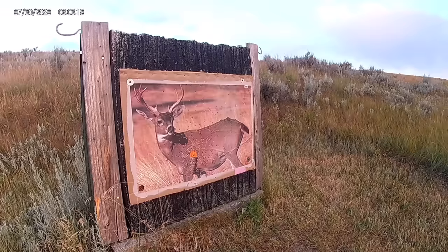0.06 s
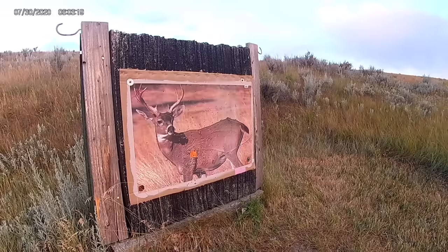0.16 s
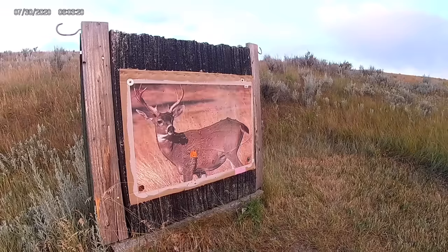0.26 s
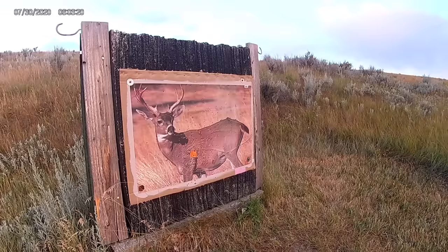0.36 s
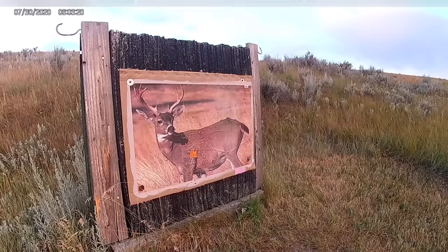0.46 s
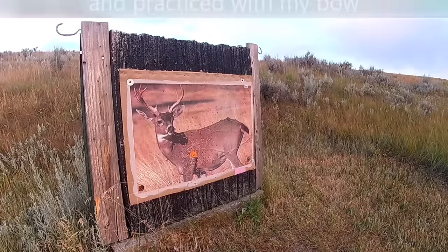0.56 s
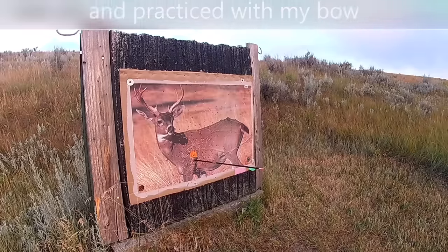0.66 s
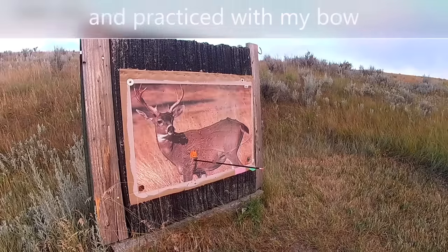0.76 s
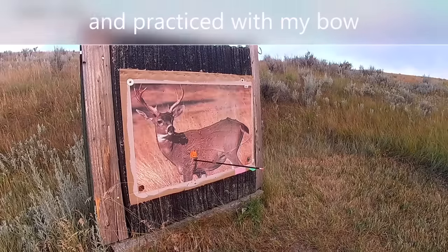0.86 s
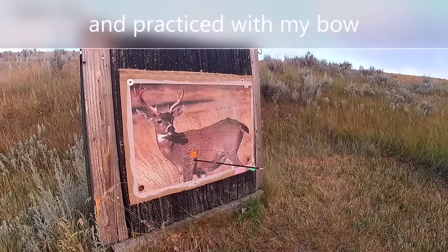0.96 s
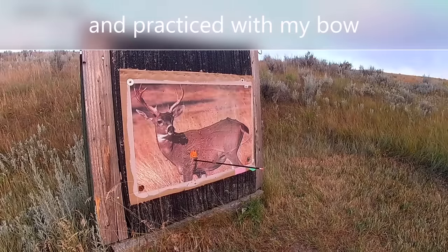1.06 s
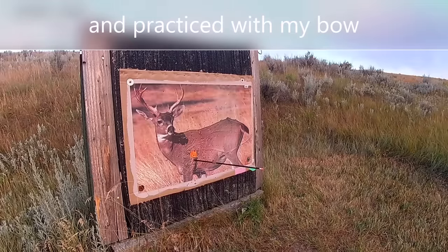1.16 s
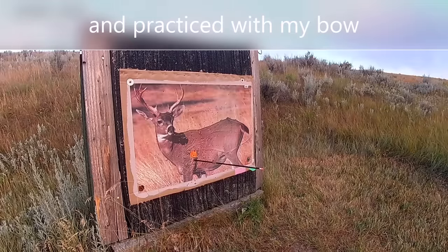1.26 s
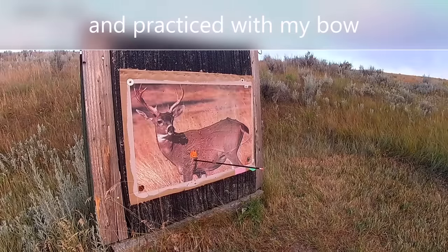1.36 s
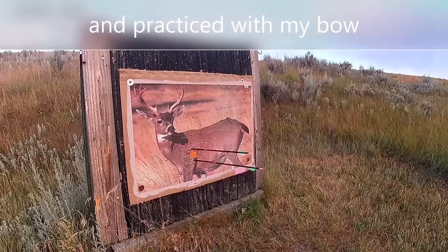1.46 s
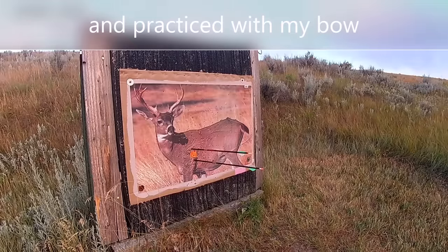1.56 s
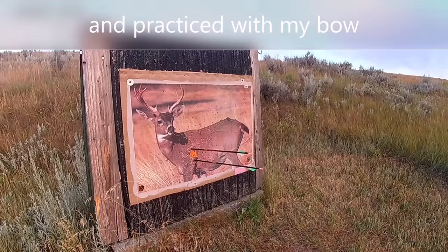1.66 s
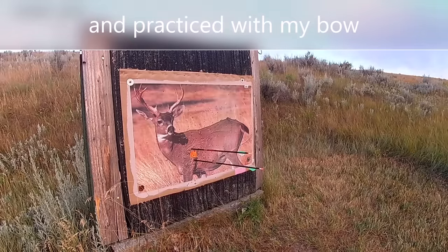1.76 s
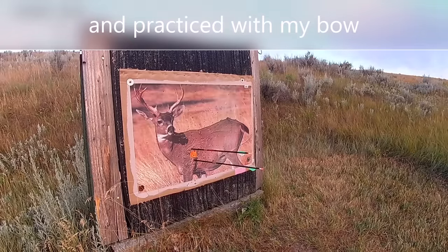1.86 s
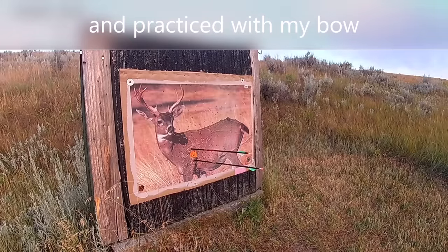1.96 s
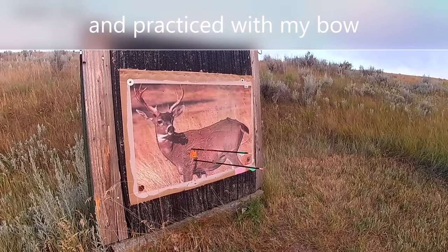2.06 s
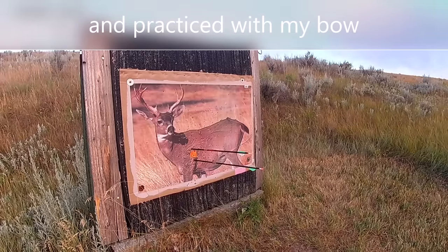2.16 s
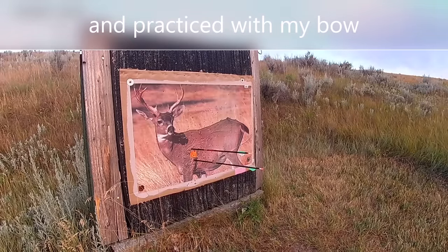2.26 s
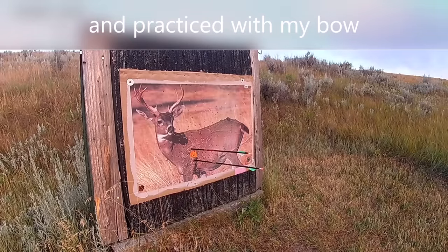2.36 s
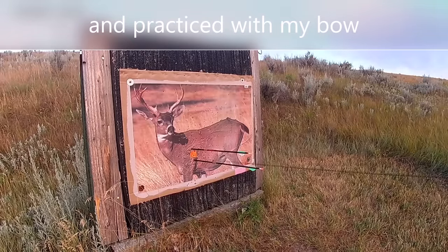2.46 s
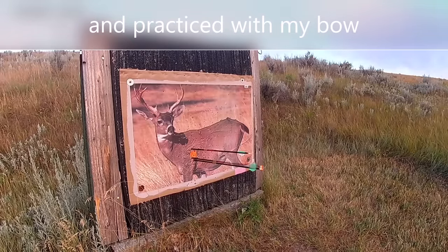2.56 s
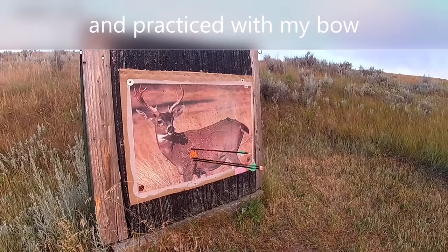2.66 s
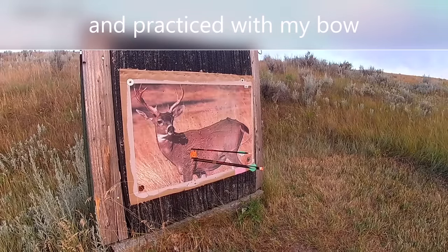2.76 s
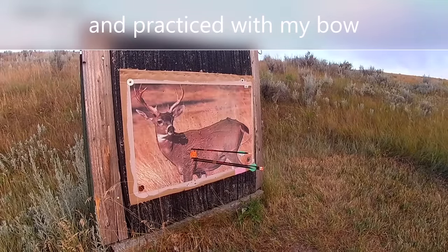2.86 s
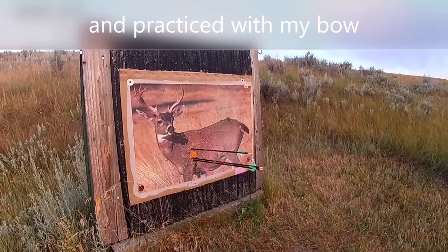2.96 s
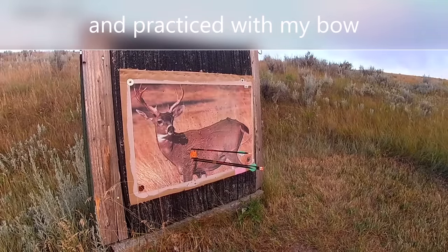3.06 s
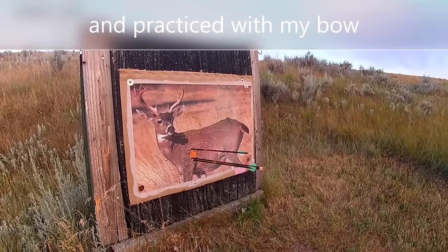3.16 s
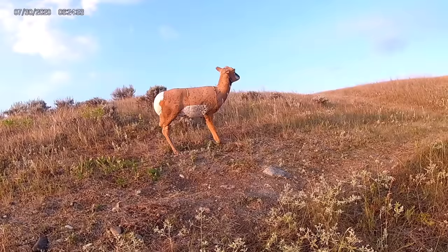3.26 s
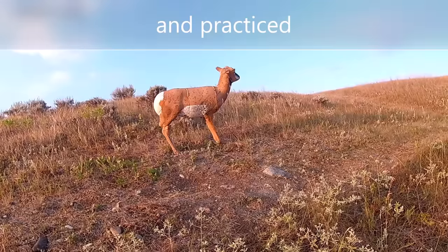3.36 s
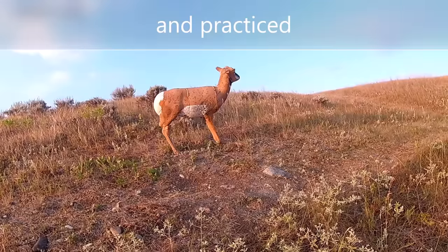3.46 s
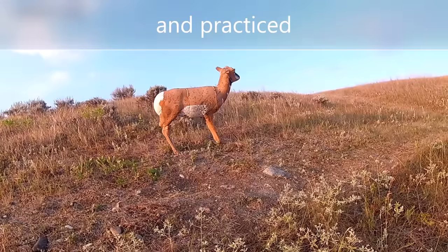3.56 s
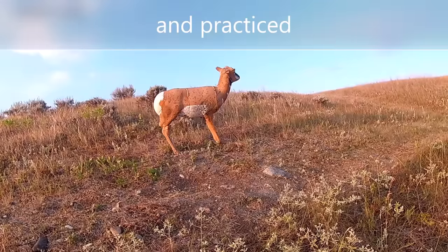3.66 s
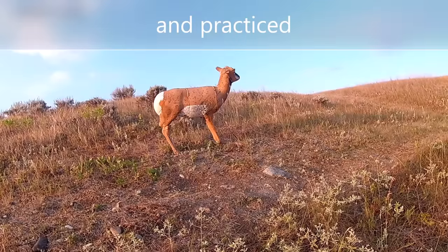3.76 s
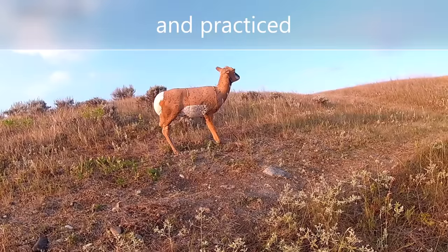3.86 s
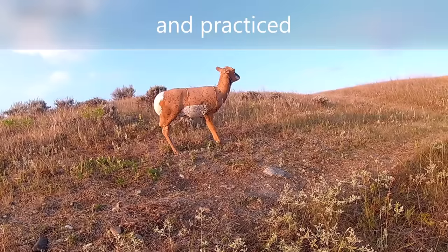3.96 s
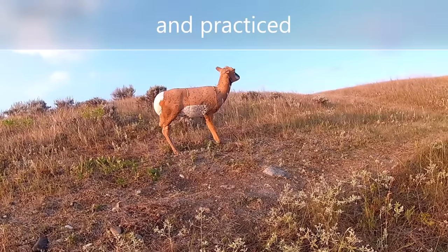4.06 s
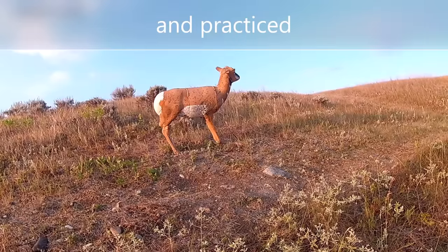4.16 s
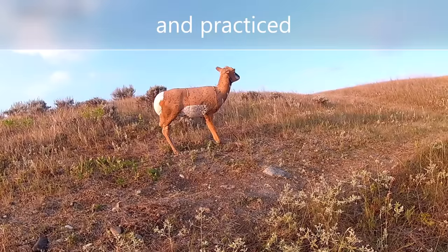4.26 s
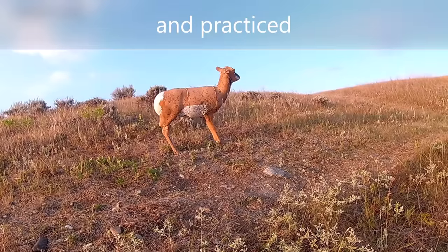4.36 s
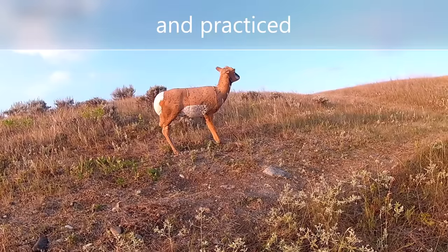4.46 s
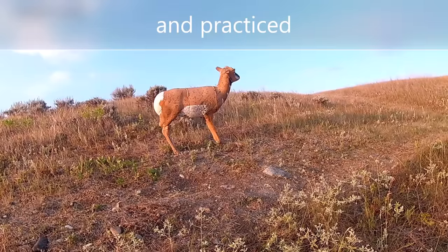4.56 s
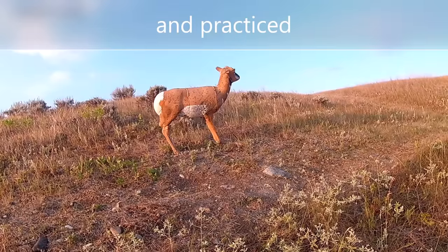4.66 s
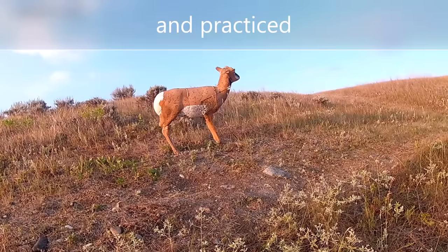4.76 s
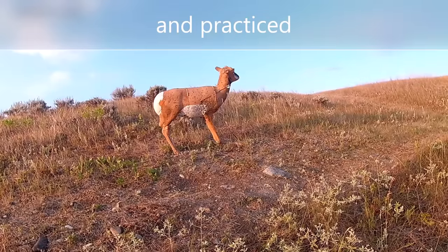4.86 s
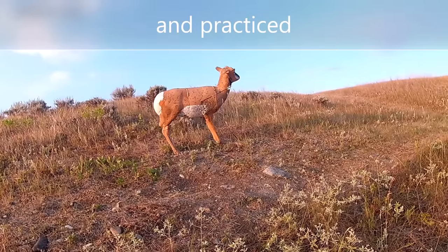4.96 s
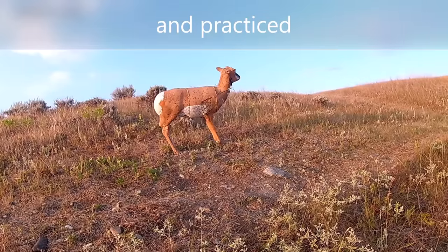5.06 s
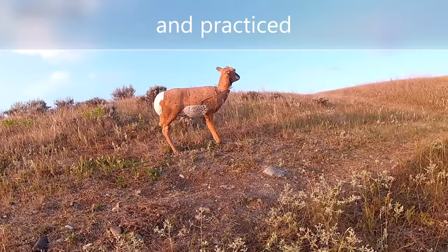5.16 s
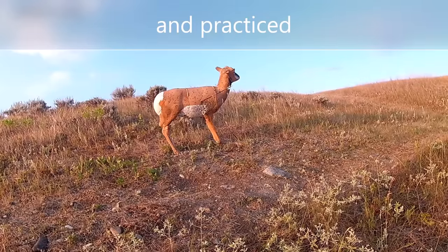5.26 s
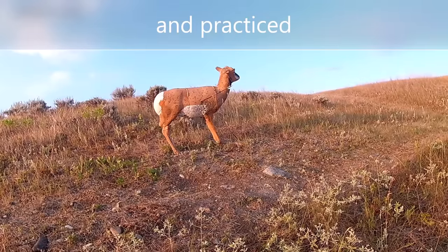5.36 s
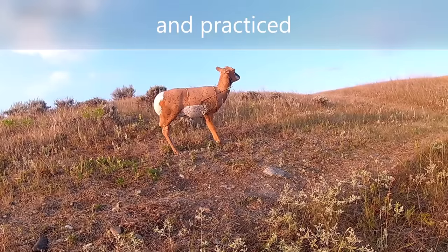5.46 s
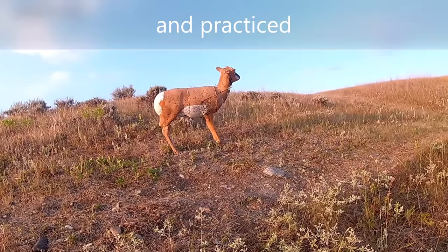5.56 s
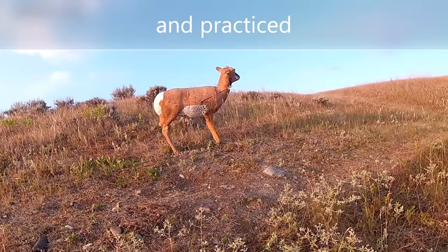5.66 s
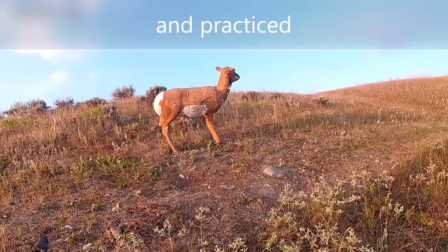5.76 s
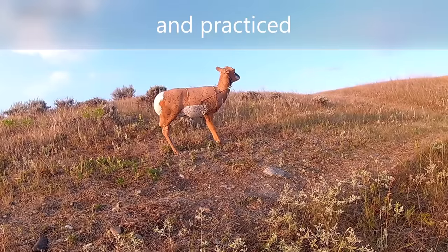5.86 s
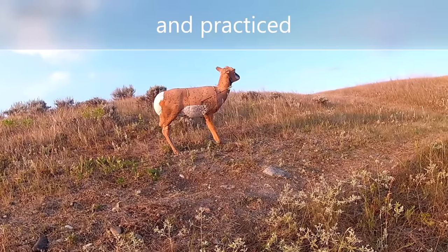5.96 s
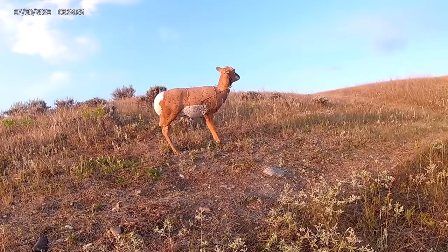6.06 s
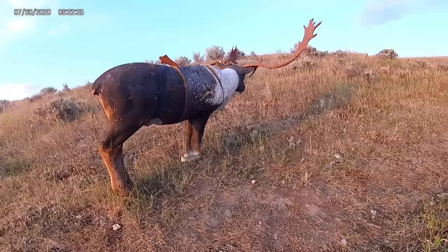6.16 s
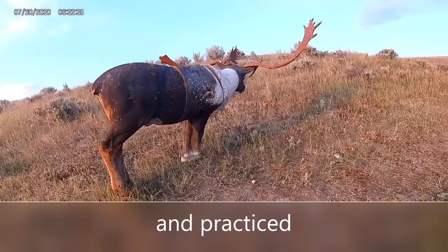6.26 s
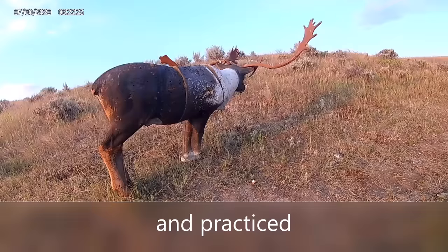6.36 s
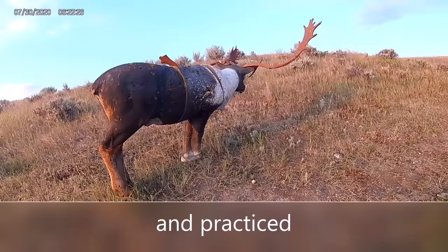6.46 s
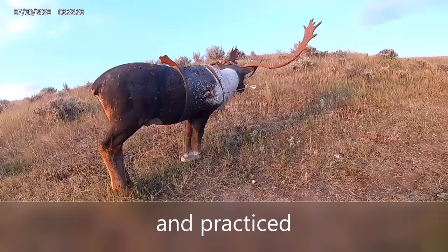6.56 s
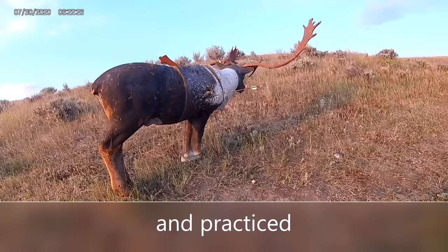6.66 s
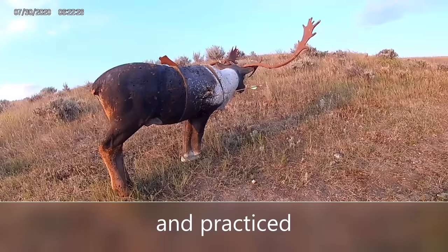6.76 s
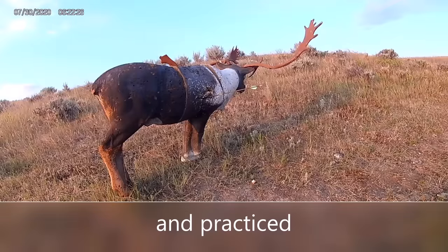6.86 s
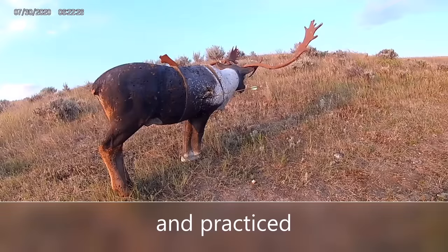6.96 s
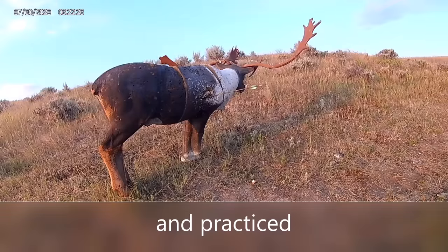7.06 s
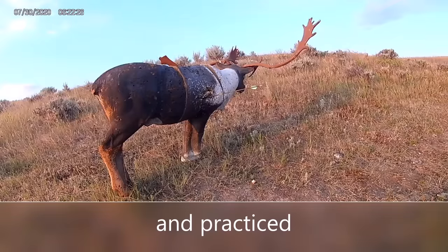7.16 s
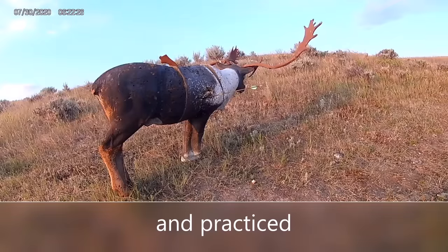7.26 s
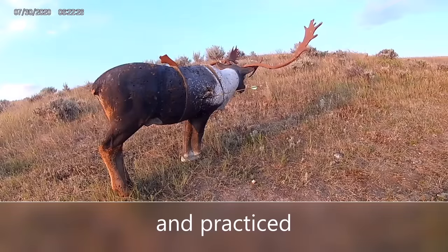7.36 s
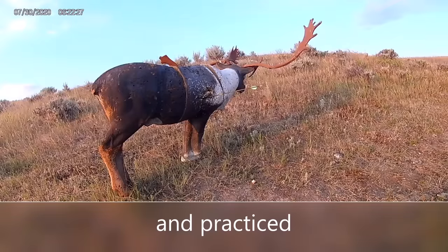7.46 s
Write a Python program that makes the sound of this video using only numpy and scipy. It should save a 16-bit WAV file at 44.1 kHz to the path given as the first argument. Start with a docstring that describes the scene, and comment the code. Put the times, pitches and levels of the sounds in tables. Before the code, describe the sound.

Archery practice on a quiet grassy hillside, heard from right beside the targets. Three times a soft distant bow snap is followed quickly by a loud, sharp crack and woody knock as an arrow punches a paper-faced board. Then a duller bow snap and a hollow thud into a foam deer, some small dry ticks, and a last snap and deep hollow thump into a foam caribou. Faint air throughout, one barely audible bird whistle.

```python
"""Hillside archery practice

Three outdoor scenes heard from beside the targets, over faint shaped-noise air and one far sine whistle.
Each distant bow snaps in bursts of filtered noise, then vane hiss swells as one over the distance.
Arrows land as damped modes of face, shaft and body with a tear and a diffuse tail: three cracks in a
paper-faced board, then hollow thuds in a foam deer and a foam caribou. A few dry noise ticks between."""
import sys
import numpy as np
from scipy import signal
from scipy.fft import rfft, irfft
from scipy.io import wavfile

SR = 44100
rng = np.random.default_rng(int(sys.argv[2]) if len(sys.argv) > 2 else 0)


def unload_audio(sound):
    """Save the sound as a 16-bit wav file, at the path given as the first command line argument."""
    columns = np.transpose(np.atleast_2d(sound))
    # keep every value between -1 and 1, then stretch to whole-number steps
    steps = np.round(np.clip(columns, -1, 1) * 32767)
    wavfile.write(sys.argv[1], SR, steps.astype(np.int16))


N = 331191
TIME = np.arange(N) / SR
AGE = TIME[:SR // 2]   # time since the start of one short sound

# Outdoor air around the board and around the foam animals: pitch_hz, relative density_db (per Hz)
BOARD_AIR = [(15, -36.5), (25, -6.5), (44, -7), (101, -3), (133, -0.5), (164, -11.5), (198, -1), (410, -13),
             (552, -14), (598, -11), (666, -16.5), (871, -16), (1170, -20.5), (1300, -20.5), (15500, -44)]
SLOPE_AIR = [(15, -19.5), (25, -6), (69, -0.5), (116, -2), (209, -7.5), (297, -9), (741, -17.5),
             (1200, -22), (1950, -27), (2420, -29.5), (3000, -32.5), (6210, -43), (7500, -43),
             (10100, -50.5), (15500, -47.5)]
# The air of each scene: start_s, end_s, level_db
BOARD_SCENE, DEER_SCENE, CARIBOU_SCENE = (0.11, 3.182, -66.5), (3.291, 6.176, -63.5), (6.258, 7.6, -64)
# Brief level dips in the board scene's background, all of one depth and width
DIPS_S, DIP_DB, DIP_WIDTH_S = [1.080, 1.5, 2.879], -19, 0.01

# Bow releases: start_s, level_db, string_slap_db (against the release), place
RELEASES = [(0.5600, -40.5, -1.5, "board"), (1.2983, -45.5, 1, "board"), (2.2144, -49.5, -2.5, "board"),
            (4.5230, -43.5, -0.5, "slope"), (6.2840, -45.5, -1.5, "slope")]
# The bow as heard from each place: centre_hz, treble_edge_hz (for a release at BOW_USUAL_DB), t60_s,
# limb_thump_db, cable_sizzle_db (both against the release)
BOW_COLOUR = {"board": (2350, 4500, 0.068, -13, -24), "slope": (1150, 2200, 0.087, -4, -45)}
# A louder release is brighter: its treble edge rises an octave per BOW_DB_PER_OCTAVE
BOW_USUAL_DB, BOW_DB_PER_OCTAVE = -45, 24

# The arrow's approach to each target: nearing_s, vane_hiss_centre_hz
APPROACH = {"board": (0.005, 2750), "deer": (0.029, 1400), "caribou": (0.011, 1390)}
# Vane hiss on landing for a nearing time of CLOSE_S; each doubling of that time makes it fainter and duller
CLOSE_S, VANE_DB, VANE_EDGE_HZ = 0.005, -39.5, 11000
VANE_LOSS_DB, VANE_LOSS_OCTAVES = 3.8, 0.45
VANE_REACH = 3.3   # the hiss emerges this many nearing times before the landing

# Landings: start_s, target, face_db, face_pitch_ratio, body_db, shaft_ping_db, tear_db, tear_t60_s
# (face, body and ping levels are added to those of the modes)
ARROWS = [(0.6585, "board", 1, 0.99, -1, 4, -22, 0.01), (1.494, "board", -2.5, 0.9, -1.5, -12, -33, 0.006),
          (2.5199, "board", 3, 1.0, -1.5, -1, -30, 0.036), (4.7894, "deer", 3.5, 1.0, 0.5, -19, -50, 0.061),
          (6.5953, "caribou", -2, 1.0, 0.5, -21, -52, 0.08)]
# How each target yields: bite_s, shaft_stopping_s, rebound_delay_s, scatter_db (against the landing's body_db)
GIVE = {"board": (0.00015, 0.0026, 0.0084, -31.5), "deer": (0.002, 0.00465, 0.005, -29.5),
        "caribou": (0.00043, 0.0058, 0.0109, -30.5)}
# Face modes, rung as the point breaks through: pitch_hz (before the landing's ratio),
# level_db (before a random spread), t60_s
BOARD_FACE = [(883, -29, 0.037), (1120, -22.5, 0.022), (1450, -25, .01), (1800, -21.5, .009),
              (2270, -11, 0.008), (2852, -20.5, 0.011), (3290, -21.5, .007), (5300, -35.5, 0.0055)]
DEER_FACE = [(737, -29.5, 0.052), (862, -11, 0.015), (1010, -29, 0.012), (1520, -31, 0.025),
             (1936, -30, 0.016), (2770, -31, 0.0084)]
CARIBOU_FACE = [(612, -18, 0.013), (880, -25, 0.055), (1097, -17, 0.02), (1237, -23, 0.033),
                (1795, -23.5, 0.025), (2800, -34.5, 0.017), (3830, -41.5, 0.035)]
FACES = {"board": BOARD_FACE, "deer": DEER_FACE, "caribou": CARIBOU_FACE}
# The thin ping of point and shaft: pitch_hz, level_db (before a random spread), t60_s
SHAFT = [(5270, -43, 0.03), (5860, -45, 0.027), (8050, -48, 0.028), (10730, -55, 0.04), (12500, -52, 0.028),
         (13000, -53, 0.025)]
# Body modes, rung as the shaft is stopped: pitch_hz (before BODY_PITCH), level_db (before a random spread), t60_s
BODIES = { "board": [(94, -39, .15), (139, -23.5, 0.031), (182.35, -44.5, 0.35), (259, -30, .06),
          (328.5, -35, 0.13), (344, -41, 0.21), (528, -33, .06), (569, -34, .04), (702.4, -34, .035),
          (824, -42, .055), (958, -41.5, .08)], "deer": [(149.6, -50.5, .08), (246.4, -21.5, 0.034),
          (300, -16.5, 0.033), (364, -19, 0.0249), (491, -24, 0.036)], "caribou": [(88, -33.5, 0.1),
          (181.7, -31.5, 0.099), (198, -36.5, 0.17), (304, -20.5, 0.037), (349, -24, 0.043),
          (439, -5, 0.016), (490, -18.5, 0.025)]}
BODY_PITCH, REBOUND_DB = 0.97, -12   # pitch ratio; rebound level against the body's first thud
# Sound scattered by frame, ground and brush: pitch_hz, relative density_db (per Hz), t60_s
BOARD_SCATTER = [(70, -11, .17), (140, -3.5, 0.23), (400, -2.5, .12), (865, 0, 0.11), (1500, -5, .045),
                 (3000, -6.5, 0.025), (5500, -19, 0.036), (8000, -27, 0.06), (15000, -38, .04)]
DEER_SCATTER = [(70, -4.5, 0.11), (200, 2.5, .11), (500, 3.5, 0.083), (900, 1, 0.075), (1590, -9, 0.12),
                (2930, -20, 0.063), (4940, -37.5, 0.029), (8000, -44, 0.037), (14950, -43.5, 0.073)]
CARIBOU_SCATTER = [(70, -13, 0.19), (200, 2, 0.12), (500, 5.5, 0.082), (1000, -3.5, 0.074),
                   (1800, -8, 0.077), (2980, -20.5, 0.084), (4970, -33, 0.13), (8000, -35, 0.073),
                   (14900, -36, 0.081)]
SCATTER = {"board": BOARD_SCATTER, "deer": DEER_SCATTER, "caribou": CARIBOU_SCATTER}
# A tear no longer than QUICK_TEAR_S is centred on TEAR_HZ; slower ones are duller by this power of their length
TEAR_HZ, QUICK_TEAR_S, TEAR_DULLING = 5400, 0.01, 0.8

# Small dry ticks: start_s, level_db, centre_hz, t60_s
TICKS = [(3.313, -57.5, 986, 0.012), (4.8200, -43, 1200, 0.02), (4.9195, -54.5, 1620, 0.016),
         (5.2465, -50, 870, 0.042), (5.7055, -56, 1150, 0.028)]
TICK_EDGE_HZ = 2550

# One far bird whistle: start_s, final_pitch_hz, level_db
BIRD = (6.91, 2344, -78)
# It starts high and settles, with a fade at both ends
BIRD_SAG_HZ, BIRD_SAG_S, BIRD_FADE_S, BIRD_LENGTH_S = 115, 0.025, 0.014, 0.13

CUTOFF_HZ = 15750


def from_db(db):
    """Decibels to gain."""
    return 10 ** (np.asarray(db) / 20)


def rms_one(x):
    """Scale to rms 1."""
    return x / np.sqrt(np.mean(x ** 2) + 1e-20)


def at_hz(points, hz):
    """Read a table on a log-frequency axis."""
    known_hz, values = np.transpose(points)
    return np.interp(np.log(np.maximum(hz, 1)), np.log(known_hz), values)


def add(out, s, sound):
    """Mix a sound in from time s on."""
    start = int(round(s * SR))
    out[start:start + len(sound)] += sound[:N - start]


def noise(gain_at, size):
    """Noise of rms 1 whose colour is a function of frequency."""
    hz = np.fft.rfftfreq(size, 1 / SR)
    spectrum = rfft(rng.standard_normal(size))
    return rms_one(irfft(spectrum * gain_at(hz), size))


def fade(t60):
    """Exponential decay, 60 dB in t60."""
    return np.exp(-np.log(1000) * AGE / t60)


def onset(rise_s):
    """Exponential approach to full level."""
    return 1 - np.exp(-AGE / rise_s)


def burst(envelope, centre_hz, q, top_hz):
    """A puff of noise through one broad resonance, its treble absorbed on the way; the envelope sets its rms."""
    resonance = np.concatenate(signal.iirpeak(centre_hz, q, fs=SR))
    absorption = signal.butter(4, top_hz, fs=SR, output="sos")
    chain = np.vstack([resonance, absorption])
    # the energy of the impulse response tells how much the filters change the noise level
    gain = np.linalg.norm(signal.sosfilt(chain, signal.unit_impulse(SR // 20)))
    return signal.sosfilt(chain, envelope * rng.standard_normal(len(envelope))) / gain


def air(span, spectrum):
    """Soft, even outdoor rush that fades quickly at the ends of its scene."""
    start, end, db = span
    edges = np.clip(np.minimum(TIME - start, end - TIME) / 0.028, 0, 1) ** 2
    return edges * from_db(db) * noise(lambda hz: from_db(at_hz(spectrum, hz)), N)


def background():
    """The air of the three scenes, with brief level dips in the first."""
    dips_db = DIP_DB * sum(np.exp(-((TIME - s) / DIP_WIDTH_S) ** 2) for s in DIPS_S)
    board = from_db(dips_db) * air(BOARD_SCENE, BOARD_AIR)
    return board + air(DEER_SCENE, SLOPE_AIR) + air(CARIBOU_SCENE, SLOPE_AIR)


def bows():
    """The string slaps home, limbs knock, cables buzz, and the hillside returns a faint wash."""
    out = np.zeros(N)
    for s, db, slap_db, place in RELEASES:
        hz, edge_hz, t60, limb_db, sizzle_db = BOW_COLOUR[place]
        top_hz = edge_hz * 2 ** ((db - BOW_USUAL_DB) / BOW_DB_PER_OCTAVE)
        slap = from_db(slap_db) * fade(0.014)
        slap_and_buzz = np.hypot(slap, fade(t60) * onset(0.007))
        buzz = burst(slap_and_buzz, hz, q=1.35, top_hz=top_hz)
        rattle = from_db(-22) * burst(fade(0.052) * onset(0.0037), centre_hz=5300, q=3.0, top_hz=6760)
        sizzle = from_db(sizzle_db) * burst(fade(0.042), centre_hz=8000, q=0.63, top_hz=13000)
        thump = burst(fade(0.14), centre_hz=380, q=0.92, top_hz=1200)
        knock = burst(slap, centre_hz=750, q=1.0, top_hz=1680)
        limbs = from_db(limb_db) * (thump + knock)
        wash = from_db(-24) * burst(fade(0.5), hz, q=1.8, top_hz=2720)
        add(out, s, from_db(db) * (buzz + rattle + sizzle + limbs + wash))
    return out


def flights():
    """Vane hiss flutters, swells as one over the distance and stops when the arrow lands."""
    out = np.zeros(N)
    for s, target, *_ in ARROWS:
        nearing, centre_hz = APPROACH[target]
        doublings = np.log2(nearing / CLOSE_S)
        # shaped backwards from the landing, then reversed
        distance = 1 + AGE / nearing
        emerging = 1 / (1 + (AGE / (VANE_REACH * nearing)) ** 4)
        flutter_db = 1.1 * noise(lambda hz: 1 / (1 + (hz / 70) ** 2), len(AGE))
        swell = (from_db(flutter_db) * emerging / distance)[::-1]
        top_hz = VANE_EDGE_HZ / 2 ** (VANE_LOSS_OCTAVES * doublings)
        hiss = burst(swell, centre_hz, q=1.9, top_hz=top_hz)
        add(out, s - len(AGE) / SR, from_db(VANE_DB - VANE_LOSS_DB * doublings) * hiss)
    return out


def ring(modes, pitch, spread_db):
    """Damped modes, pitch scaled by a ratio; each strength is drawn with a small random spread in dB."""
    out = np.zeros(len(AGE))
    for hz, db, t60 in modes:
        strength = from_db(db + spread_db * rng.standard_normal())
        out += strength * np.sin(2 * np.pi * pitch * hz * AGE) * fade(t60)
    return out


def scatter(table):
    """A diffuse tail in overlapping octave bands, each with its own decay."""
    spectrum, decays = np.array(table)[:, :2], np.array(table)[:, ::2]
    tail = rfft(noise(lambda hz: from_db(at_hz(spectrum, hz)), len(AGE)))
    octave = np.log2(np.maximum(np.fft.rfftfreq(len(AGE), 1 / SR), 1))
    out = np.zeros(len(AGE))
    for centre in range(6, 15):   # band centres of 64 Hz to 16 kHz
        band = irfft(tail * np.maximum(1 - abs(octave - centre), 0), len(AGE))
        out += band * fade(at_hz(decays, 2 ** centre))
    return out * onset(0.0012)


def impacts():
    """The point tears the face; a moment later the target stops the shaft, and the body is shoved and rebounds."""
    out = np.zeros(N)
    for s, target, face_db, pitch, body_db, ping_db, tear_db, tear_t60 in ARROWS:
        bite, stopping, rebound, scatter_db = GIVE[target]
        # taut paper answers at once, a foam skin gives way first
        face = from_db(face_db) * ring(FACES[target], pitch, spread_db=1.8)
        ping = from_db(ping_db) * ring(SHAFT, 1, spread_db=1.5)
        crack = (face + ping) * onset(bite)
        tear_hz = TEAR_HZ * min(QUICK_TEAR_S / tear_t60, 1) ** TEAR_DULLING
        tearing = from_db(tear_db) * burst(fade(tear_t60), tear_hz, q=1.6, top_hz=7500)
        tail = from_db(body_db + scatter_db) * scatter(SCATTER[target])
        thud = from_db(body_db) * ring(BODIES[target], BODY_PITCH, spread_db=0.97) * onset(0.0009)
        add(out, s, crack + tearing + tail)
        add(out, s + stopping, -thud)
        add(out, s + stopping + rebound, -from_db(REBOUND_DB) * thud)
    # the deep bass of all landings is thinned
    return signal.sosfilt(signal.butter(2, 75, "high", fs=SR, output="sos"), out)


def ticks():
    """Short dry snaps: quickly fading noise through a broad resonance."""
    out = np.zeros(N)
    for s, db, hz, t60 in TICKS:
        add(out, s, from_db(db) * burst(fade(t60), hz, q=1.0, top_hz=TICK_EDGE_HZ))
    return out


def bird():
    """A thin sine whistle that sags in pitch."""
    out = np.zeros(N)
    s, final_hz, db = BIRD
    hz = final_hz + BIRD_SAG_HZ * np.exp(-AGE / BIRD_SAG_S)
    envelope = np.clip(np.minimum(AGE, BIRD_LENGTH_S - AGE) / BIRD_FADE_S, 0, 1)
    add(out, s, from_db(db) * envelope * np.sin(2 * np.pi * np.cumsum(hz) / SR))
    return out


def scene():
    """Shots and small sounds over the air of the three scenes."""
    return (background() + bows() + flights() + impacts() + ticks() + bird())[None]


def record(dry):
    """The microphone sheds the deepest bass; the top is cut."""
    thinned = signal.sosfilt(signal.butter(1, 18, "high", fs=SR, output="sos"), dry)
    return signal.sosfilt(signal.ellip(10, 0.1, 80, CUTOFF_HZ, fs=SR, output="sos"), thinned)


dry = scene()
out = record(dry)
unload_audio(out)
```